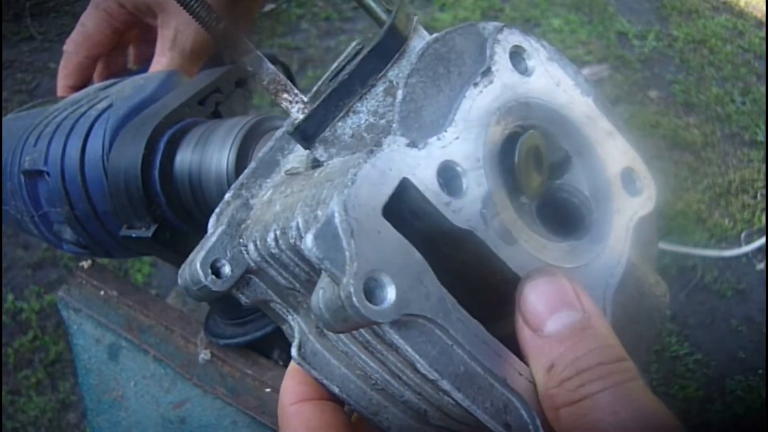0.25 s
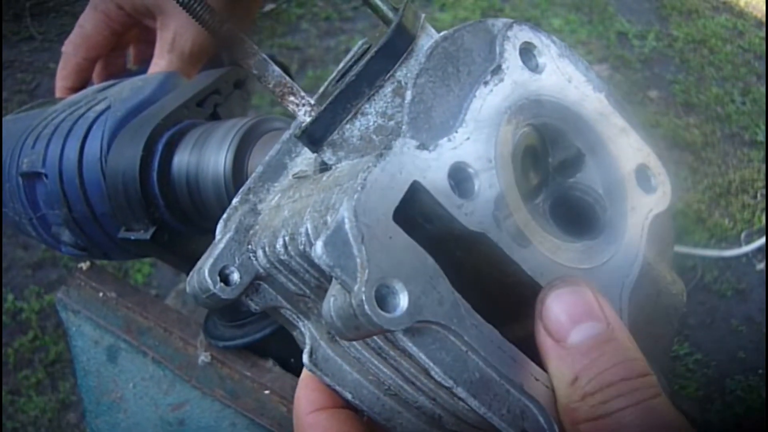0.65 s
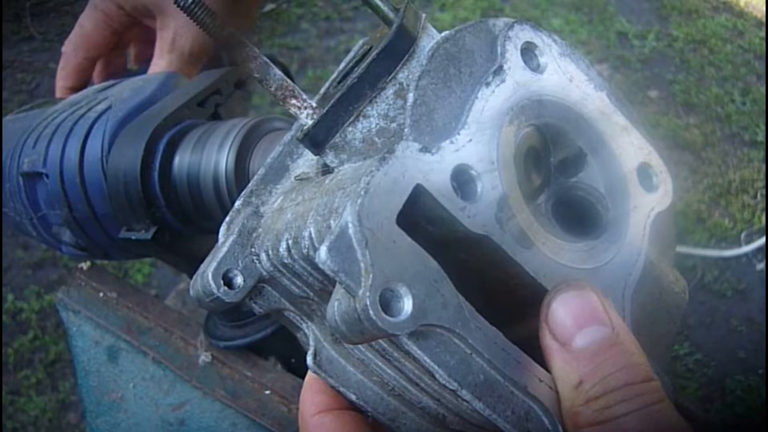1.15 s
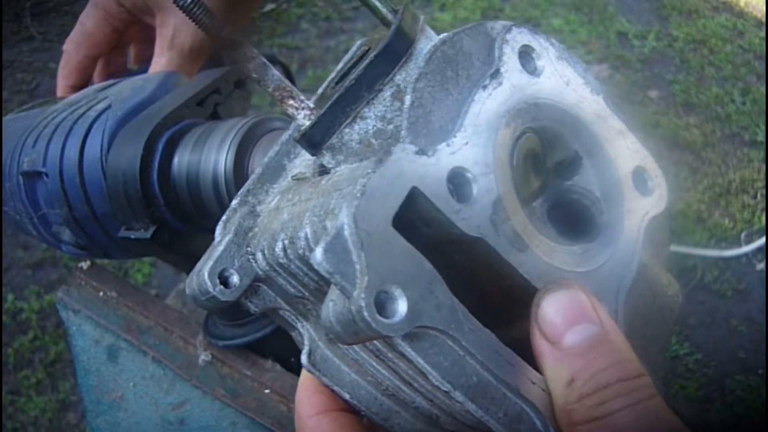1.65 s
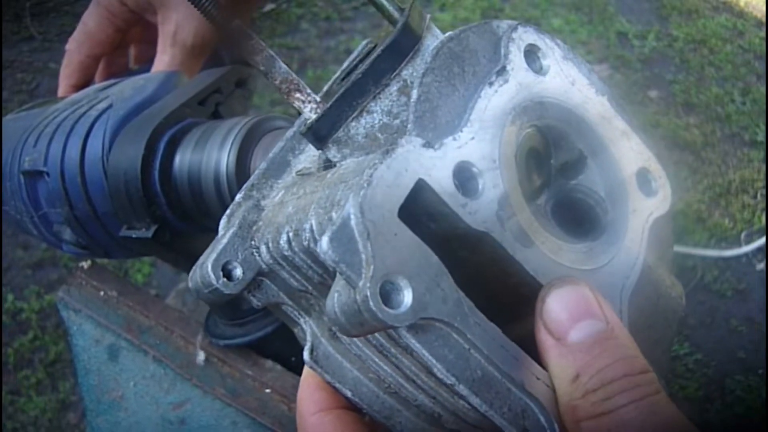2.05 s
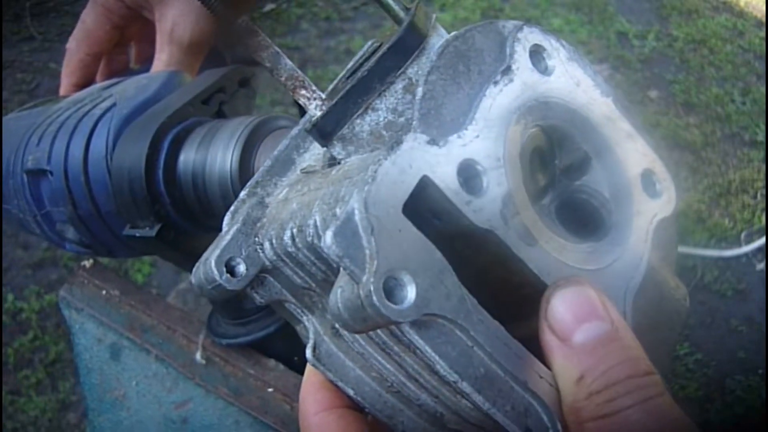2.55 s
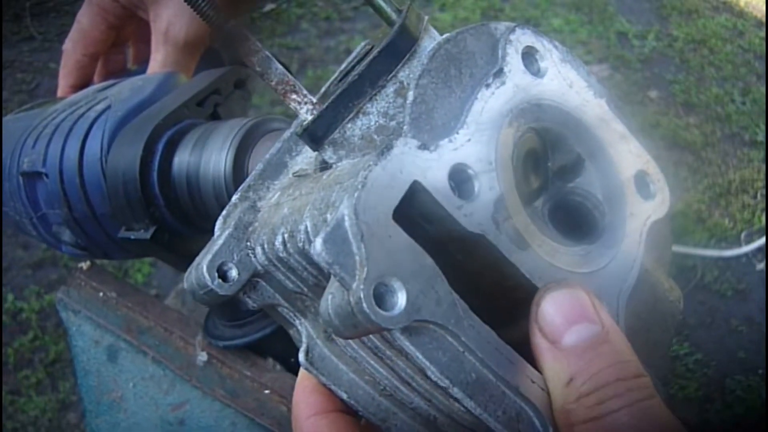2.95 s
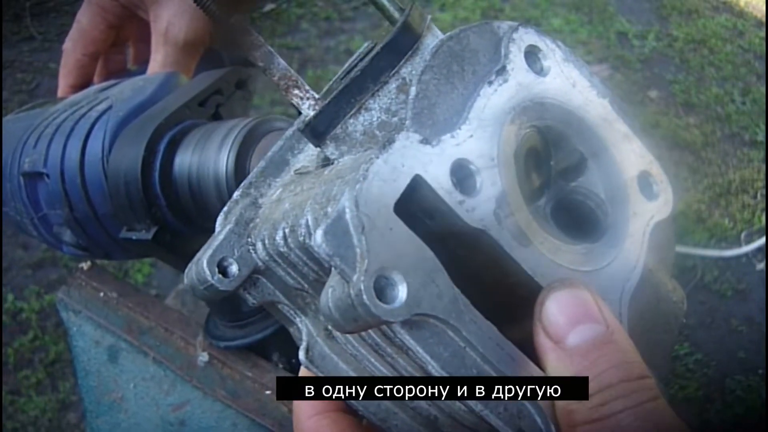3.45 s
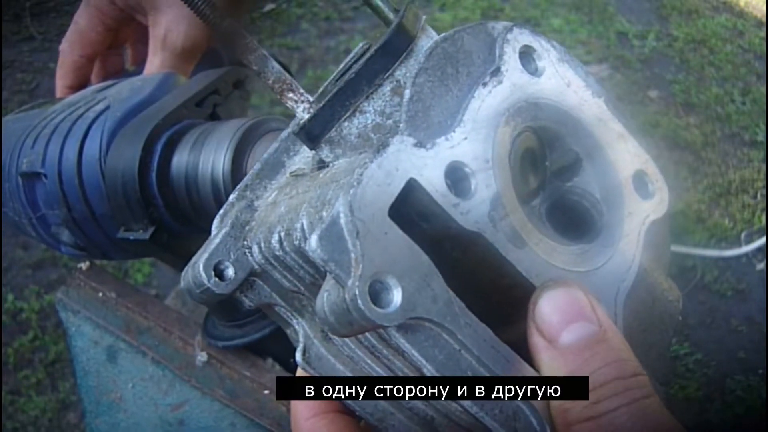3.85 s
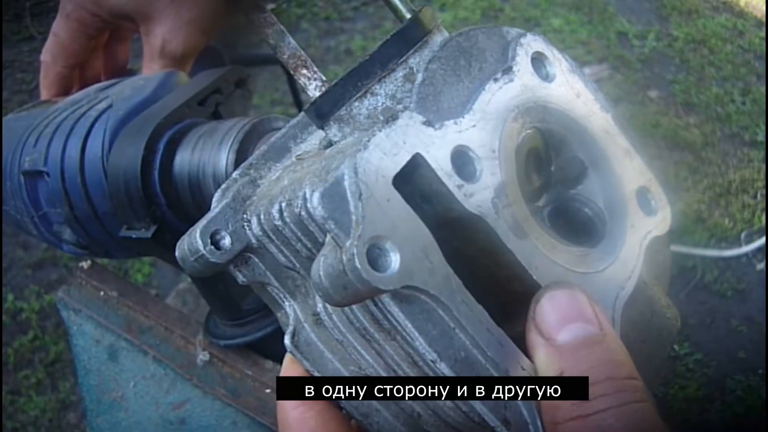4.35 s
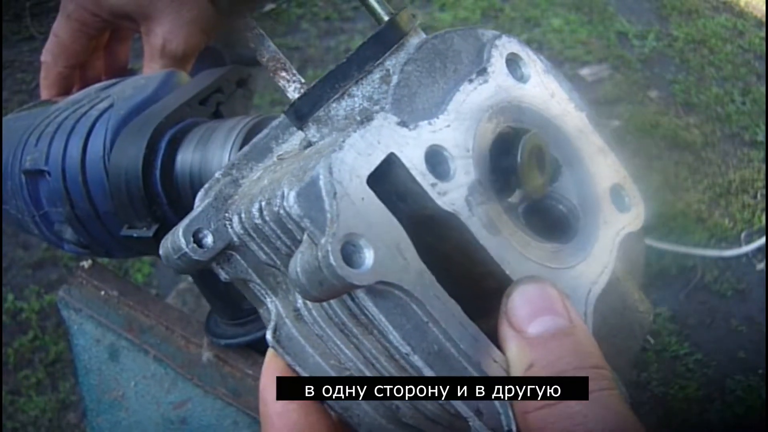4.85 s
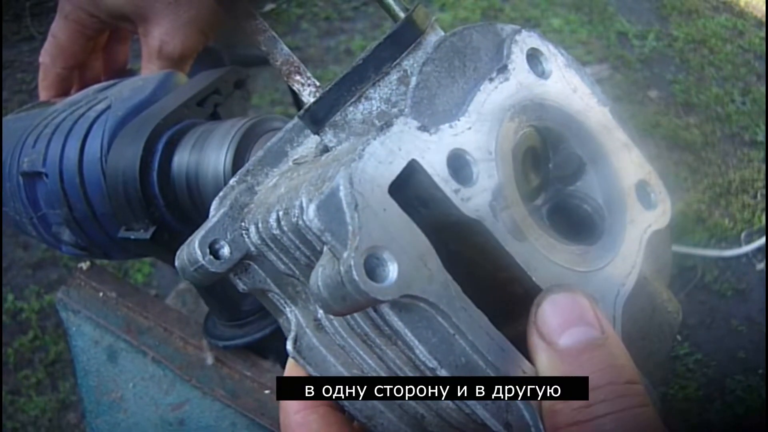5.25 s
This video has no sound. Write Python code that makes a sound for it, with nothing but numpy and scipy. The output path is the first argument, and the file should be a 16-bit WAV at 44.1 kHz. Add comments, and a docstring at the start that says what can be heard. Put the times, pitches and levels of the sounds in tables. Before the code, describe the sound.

A power drill runs loudly, its gears rattling and whining through ringing metal as a valve grinds on its seat. Soft bassy thumps bump the microphone in the first second. Pitch and level sag in steps, becoming duller and hollower, until an abrupt stop. A near-silent pause of under half a second follows, then scattered clacks and a brighter, less airy reverse spin-up. Mono, close, dry, with no echo and softened highest treble.

```python
"""A close, clattering, whining electric drill slows; the sound breaks off abruptly, then the drill is heard
starting up in reverse. It grinds a valve on its seat: tooth strikes, gear bounces and noise ring modes of gear
housing and cylinder head. Shaft-locked tones make the whine, pulsing noise the fan and brush rush; speed and
hand pressure set level and tone. The handled microphone adds damped thumps and low rumble over a faint
background of coloured noise."""
import sys
import numpy as np
from scipy import signal
from scipy.fft import rfft, irfft
from scipy.io import wavfile
from scipy.ndimage import uniform_filter1d

SR = 44100
rng = np.random.default_rng(int(sys.argv[2]) if len(sys.argv) > 2 else 0)


def materialize(psi):
    """Save the field psi as 16-bit PCM at rate SR to the path in sys.argv[1].

    A 1-D psi becomes a single channel; in a 2-D psi each row is a channel.
    """
    bounded = np.clip(np.atleast_2d(psi).T, -1, 1)
    quanta = np.round(bounded * 32767).astype(np.int16)
    wavfile.write(sys.argv[1], SR, quanta)


N = 242550
T = np.arange(N) / SR  # time in s
BINS = np.maximum(np.arange(N // 2 + 1) * SR / N, 1)  # spectrum frequencies in Hz

# the drill forward, then in reverse: (start [s], stop [s], level at full speed without load [dB], treble [dB],
# fan [dB], backlash knocks [dB], scatter of the tooth strikes [turns])
DRILL_RUNS = [(-.1, 3.956, -26, 0, 1, -2, .065), (4.345, 5.6, -28.5, 2.5, -18, -6.5, .2)]


def undb(db):
    """Decibels to gain."""
    return 10 ** (np.asarray(db) / 20)


def unit(x):
    """Scale to rms 1."""
    return x / np.sqrt(np.mean(x ** 2))


def curves(rows):
    """Each column of a table, joined by straight lines in time."""
    s, *columns = np.transpose(rows)
    return [np.interp(T, s, column) for column in columns]


def noise():
    """White noise."""
    return rng.standard_normal(N)


def walk(rate):
    """Smooth random wander with a spread near 1; rate is new values per second."""
    hold = int(SR / rate)
    steps = np.repeat(rng.standard_normal(N // hold + 1), hold)
    return 1.3 * uniform_filter1d(uniform_filter1d(steps, hold), hold)[:N]


def colour(x, points):
    """Filter by a spectrum of (frequency [Hz], level [dB]) points."""
    hz, db = np.transpose(points)
    return irfft(rfft(x) * undb(np.interp(np.log(BINS), np.log(hz), db)), N)


def resonance(hz, width):
    """Frequency response of one damped mode; centre and width in Hz."""
    return 1 / (1 + 1j * (BINS / hz - hz / BINS) * hz / width)


def body(modes):
    """Response of a set of modes: their powers add, and the phase is that of a causal ring."""
    parts = [undb(db) * resonance(hz, width) for hz, width, db in modes]
    power = sum(np.abs(part) ** 2 for part in parts)
    cepstrum = irfft(.5 * np.log(power), N)
    # folding the cepstrum onto positive time makes the ring follow its blow
    fold = np.r_[1, np.full(N // 2 - 1, 2), np.zeros(N - N // 2)]
    return unit(np.exp(rfft(cepstrum * fold)))


def ring(x, response):
    """Play a force through a response."""
    return irfft(rfft(x) * response, N)


def taps(times, sizes):
    """Pulses at the given times, shared between neighbouring samples."""
    at = np.clip(times * SR, 0, N - 2)
    i = at.astype(int)
    return np.bincount(i, sizes * (1 - at + i), N) + np.bincount(i + 1, sizes * (at - i), N)


def chatter(pulses, decay_s):
    """Each blow breaks into a noisy burst of tiny contacts that swells and dies within a few milliseconds."""
    fade = np.exp(-2 / (decay_s * SR))
    power = signal.lfilter([(1 - fade) ** 2], [1, -2 * fade, fade ** 2], pulses ** 2 + 1e-18)
    return noise() * np.sqrt(power)


def fade_above(hz, knee_hz, order):
    """Gain near 1 below a knee, falling steeply above it."""
    return 1 / np.sqrt(1 + (hz / knee_hz) ** (2 * order))


def swells(rows, width):
    """Brief swells of noise in a resonance; width is a share of its centre."""
    out = 0
    for s, length, db, hz in rows:
        envelope = np.exp(-2 * ((T - s) / length) ** 2)
        out = out + undb(db) * envelope * unit(ring(noise(), resonance(hz, width * hz) ** 2))
    return out


def drill(run, fan_power=2.0, grind_db=-8):
    """One run: gears, motor and the grinding valve sound through the housing; speed and load set their balance."""
    # modes of gear housing and cylinder head, driven differently by the other tooth flank:
    # (centre [Hz], width [Hz], forward level [dB], reverse level [dB])
    housing_modes = [(382, 123, -6, -2.5), (786, 40, -3.5, -1), (907, 124, -0.5, 2.5), (1301, 12, 4, -7),
                     (1542, 344, -3.5, -2.5), (1623, 76, -0.5, -3), (2003, 138, -4.5, -1.5),
                     (2460, 560, -9.5, -13.5), (3175, 300, -4, -7.5), (3478, 270, -4, -3.5),
                     (4540, 320, -4.5, -25), (4914, 260, -8, -5), (6040, 660, -11.5, -19),
                     (6580, 1010, -17, -10.5)]
    # motor speed, rising a little, dipping and recovering, then falling steadily: (time [s], speed [turns/s])
    speed_forward = [(0.05, 303.9), (0.43, 305.5), (0.9, 316.2), (1.34, 319.2), (1.74, 274.3),
                     (2.05, 295.2), (2.46, 248.2), (2.59, 233.5), (2.96, 184.2), (3.3, 155.9),
                     (3.56, 127.5), (3.84, 95.8), (3.95, 81.8)]
    # motor speed climbing in reverse: (time [s], speed [turns/s])
    speed_reverse = [(4.36, 34.4), (4.416, 65.6), (4.498, 108.7), (4.614, 167.4), (4.766, 220.8),
                     (5.01, 247.9), (5.5, 288.8)]
    # air path through the vents: (centre [Hz], width [Hz], level [dB])
    vent_modes = [(370, 240, -5), (911, 97, 2), (1150, 100, -1.5), (1770, 510, -10), (2310, 720, -5.5),
                  (2730, 290, -7.5), (2930, 350, -5), (4090, 230, -8.5), (4880, 220, -2), (5770, 270, -1.5),
                  (6600, 1100, -6.5)]
    # armature tones at full speed: (multiple of motor speed, level [dB])
    motor_orders = [(3, -7), (4, -5), (5, 2.5), (6, -4), (8, -4), (9, 2), (10, 0), (14, -1), (16, -2),
                    (18, -1), (24, -2)]
    # gear mesh tones: (multiple of motor speed, forward level [dB], reverse level [dB])
    mesh_orders = [(5, -18, -20), (7, -5, -6), (8, -2, -10), (9, -9, -20), (11, -13, -9), (12, -8, 0),
                   (14, -11, -20), (22, -11, -20), (23, -11, -9), (24, -6, -1), (27, -12, -20),
                   (36, -9, -3)]
    # unbalanced rotor, one row forward and one in reverse: (speed of most shake [Hz], width [Hz], level [dB])
    shake = [(272, 110, -45), (239, 39, -46)]

    # change per dB of load: teeth stay in contact, so they knock less and whine more
    load_knock_db, load_whine_db, load_boom_db = -1.5, 1, -.6
    # change per octave of slowing: all of it fades and dulls, the hollow boom stands out
    slow_level_db, slow_treble_db, slow_boom_db = -5, -1.95, 3
    slow_knock_db = 7  # extra gear rattle, complete at half speed and below
    boom_db = -3.5  # hollow housing boom, running free at full speed
    mesh_db = -13  # gear whine, running free
    whine_knee_hz = 234  # above this speed the teeth float and their whine fades
    whine_crawl_hz = 112  # below this speed they meet too softly to whine
    motor_db, direct = -18, .35

    start, stop, level_db, treble_db, fan_db, knock_db, jitter = DRILL_RUNS[run]
    housing = body([(hz, width, dbs[run]) for hz, width, *dbs in housing_modes])
    hz, = curves([*speed_forward, *speed_reverse])
    turns = np.cumsum(hz) / SR
    speed = hz / hz.max()
    slow = -np.log2(speed)  # octaves below full speed
    load_db, bright_db = presses()

    fan = undb(fan_db) * speed ** fan_power
    knock = undb(knock_db + slow_knock_db * np.minimum(slow, 1) + load_knock_db * load_db)
    mesh = undb(mesh_db + load_whine_db * load_db)
    mesh = mesh * fade_above(hz, whine_knee_hz, order=8) * fade_above(whine_crawl_hz, hz, order=3)

    tick, sparks = brushes(turns, hz)
    grind = undb(grind_db) * noise()
    contact = undb(-4) * teeth(turns, hz, jitter) + knock * backlash(turns) + grind + tick
    tones = undb(motor_db) * speed ** 7 * whine(turns, motor_orders)
    tones = tones + mesh * whine(turns, [(k, dbs[run]) for k, *dbs in mesh_orders])

    # part of the whine leaves through the vents, uncoloured by the housing
    tone_path = housing * (1 - direct + 2 * direct / np.abs(housing))
    sound = ring(contact, housing) + ring(tones, tone_path)
    sound = sound + fan * ring(rush(turns), body(vent_modes)) + sparks
    # the parts share the power of the drive
    sound = sound / np.sqrt(1.406 + knock ** 2 + fan ** 2)
    sound = effort(sound,
                   level_db + slow_level_db * slow + load_db,
                   treble_db + slow_treble_db * slow + bright_db,
                   boom_db + slow_boom_db * slow + load_boom_db * load_db)
    running = uniform_filter1d(1. * ((T > start) & (T < stop)), size=64)
    return running * (sound + rotor(turns, hz, *shake[run])) + clacks(housing, start, stop)


def presses():
    """Load and extra treble in dB as the hand presses the valve on its seat: a rise, a hold, a quick release."""
    # (start [s], stop [s], rise [s], load [dB], extra treble [dB])
    press_rows = [(0.26, 1.312, 0.24, 1.5, 1.5), (1.636, 2.032, 0.18, 1.5, 2), (2.393, 2.95, .3, 4.5, 0),
                  (3.25, 3.826, 0.11, 3.5, 0.5), (3.836, 3.96, 0.095, 4, 4), (4.35, 4.717, 0.097, 1, 1),
                  (4.859, 5.6, 0.41, 4, 1)]
    release_s = .05
    load_db = treble_db = 0
    for start, stop, rise_s, db, bright_db in press_rows:
        force = np.clip((T - start) / rise_s, 0, 1) * np.clip(1 - (T - stop) / release_s, 0, 1)
        load_db = load_db + db * force
        treble_db = treble_db + bright_db * force
    return load_db, treble_db


def teeth(turns, hz, jitter, count=4, scatter_db=6.0, runout=0.42, loose=1.36):
    """The pinion's teeth strike unevenly, hardest on one side of each turn."""
    at = np.arange(0, turns[-1], 1 / count)
    chance = rng.standard_normal((len(at), 2))
    sizes = undb(scatter_db * np.clip(chance[:, 0], -2, 2))
    sizes = sizes * np.exp(runout * np.cos(2 * np.pi * at))
    times = np.interp(at + jitter * chance[:, 1], turns, T)
    pulses = taps(times, sizes) / np.sqrt(hz)
    clean = unit(pulses - uniform_filter1d(pulses, size=400))
    return unit(clean + loose * unit(chatter(pulses, decay_s=0.0012)))


def backlash(turns, flight_s=.008, scatter_db=1.04, jitter=.09):
    """The big gear bounces across its play and is caught again near a whole turn of the pinion."""
    chance = rng.standard_normal((1200, 3))
    landings = np.cumsum(flight_s * np.exp(.3 * chance[:, 0]))
    at = np.unique(np.round(np.interp(landings, T, turns)))[:-1]
    chance = chance[:len(at)]
    sizes = undb(scatter_db * np.clip(chance[:, 2], -2, 2))
    times = np.interp(at + jitter * chance[:, 1], turns, T)
    return unit(chatter(taps(times, sizes), decay_s=0.002))


def whine(turns, orders):
    """Tones locked to the shaft, each wavering in strength and a little in phase."""
    waver_db, wobble = 1.6, .12  # wobble in radians
    out = 0
    for k, db in orders:
        gain = undb(db + waver_db * walk(14))
        out = out + gain * np.sin(2 * np.pi * k * turns + wobble * walk(60))
    return out


def rush(turns, swing=0.89):
    """Fan air and brush hiss: noise pulsing once a turn."""
    return unit(noise() * (1 + swing * np.cos(2 * np.pi * turns)))


def brushes(turns, hz, tick_db=-10, spark_db=-15, spark_hz=6900, spark_width=1500, scatter_db=5):
    """One high commutator bar ticks the brushes every turn; sparks crackle at random in a high resonance."""
    tick = taps(np.interp(np.arange(turns[-1]), turns, T), 1) / np.sqrt(hz)
    tick = unit(tick - uniform_filter1d(tick, size=400))
    at = rng.uniform(0, turns[-1], size=2500)
    sizes = undb(scatter_db * np.clip(rng.standard_normal(len(at)), -2, 2))
    sparks = taps(np.interp(at, turns, T), sizes)
    sparks = unit(ring(sparks, resonance(spark_hz, spark_width) ** 2))
    return undb(tick_db) * tick, undb(spark_db) * sparks


def effort(sound, level_db, treble_db, boom_db, wander_db=0.38):
    """Set the level, the treble and the hollow boom; the contact wanders a little."""
    low = 1 / (1 + (BINS / 640) ** 8)
    high = 1 / (1 + (2350 / BINS) ** 8)
    bands = ring(sound, 1 - low - high)
    bands = bands + undb(boom_db) * ring(sound, low) + undb(treble_db) * ring(sound, high)
    return undb(level_db + wander_db * walk(14)) * bands


def rotor(turns, hz, peak_hz, width_hz, db):
    """The unbalanced rotor hums at the motor speed, swelling near the speed at which the drill shakes most."""
    swell = 1 / (1 + ((hz - peak_hz) / (width_hz / 2)) ** 4)
    return np.sqrt(2 * swell) * undb(db + 2.3 * walk(12)) * np.sin(2 * np.pi * turns)


def clacks(housing, start, stop):
    """Single hard knocks of the drive taking up slack ring the housing; steel on steel gives little bass."""
    # (time [s], relative strength [dB])
    clack_rows = [(2.764, -16), (3.051, -24), (3.103, -22), (3.133, -21), (3.151, -21), (4.3425, -29),
                  (4.375, -30), (4.383, -30), (4.4225, -19), (4.531, -18), (4.543, -25), (4.602, -21),
                  (4.614, -20)]
    strength_db, decay_s = 14, .0011
    tilt = [(300, -7), (900, 0), (2000, 0), (4000, -1)]  # (frequency [Hz], level [dB])
    s, db = np.transpose([row for row in clack_rows if start - .1 < row[0] < stop])
    blows = chatter(taps(s, undb(db + strength_db)), decay_s)
    return ring(colour(blows, tilt), housing)


def judder():
    """The valve catches on its seat and the head rings up: a narrow swell of noise."""
    # (time [s], length [s], level [dB], centre [Hz])
    catches = [(4.575, 0.049, -29, 870)]
    return swells(catches, width=0.07)


def handling(thump_width=0.81):
    """Each thump is one push into a low, damped ring; the shifting grip rumbles beneath."""
    # soft thumps on the microphone: (time [s], peak [dB], centre [Hz])
    thump_rows = [(.136, -22.5, 172), (.157, -28, 171), (.172, -17, 260), (.291, -22, 220),
                  (.305, -14, 198), (.369, -34, 170), (.465, -25, 180), (0.511, -21.5, 227),
                  (.571, -30, 160), (0.628, -23.5, 130), (0.654, -34, 149), (.763, -38, 130),
                  (1.553, -29.5, 180), (5.288, -40, 110)]
    # grip shifting on the microphone: (time [s], length [s], level [dB], centre [Hz])
    grip_rows = [(.13, 0.051, -37, 140), (.45, .3, -41.5, 140), (1.56, 0.25, -53, 114)]
    out = swells(grip_rows, width=.94)
    for s, db, hz in thump_rows:
        thump = ring(taps(np.array([s]), 1), resonance(hz, thump_width * hz) ** 2)
        out = out + undb(db) * thump / np.abs(thump).max()
    return out


def background():
    """Faint steady noise, weighted to the low end."""
    # (frequency [Hz], relative level [dB per Hz])
    air_spectrum = [(30, -21.5), (55, -14.5), (80, -10.5), (160, -5), (390, -3), (600, -10), (2350, -20),
                    (6200, -25), (7450, -28), (8900, -50)]
    return undb(-53.5) * unit(colour(noise(), air_spectrum))


def scene():
    """Drill, juddering valve, handling noise and background at one microphone."""
    # microphone colour: (frequency [Hz], level [dB])
    mic_colour = [(40, -10.5), (150, -7), (300, -2.5), (600, -1.5), (1200, -3), (2500, -4.5), (5000, -5),
                  (6800, -5.5), (7600, -11), (8400, -18.5), (9000, -35.5)]
    runs = sum(drill(run) for run in range(len(DRILL_RUNS)))
    tool = colour(runs + judder(), mic_colour)
    return (tool + handling() + background())[None]


def record(dry):
    """The recorder cuts the top steeply; its converter rests a little below zero."""
    top_hz, offset = 9000, -.05
    cut = signal.ellip(10, .2, 80, top_hz, fs=SR, output="sos")
    return signal.sosfilt(cut, dry) + offset


dry = scene()
out = record(dry)
materialize(out)
```